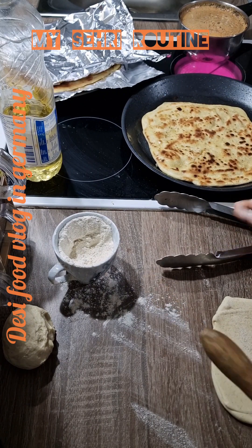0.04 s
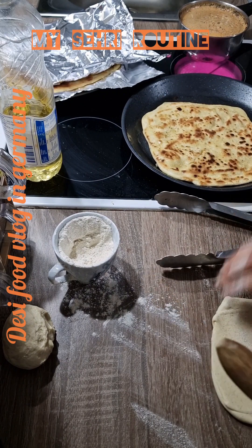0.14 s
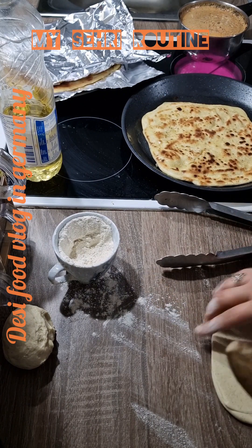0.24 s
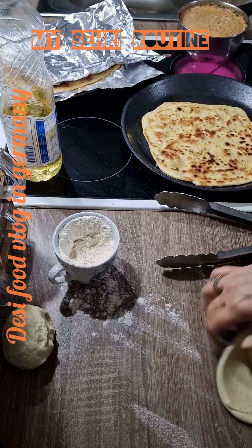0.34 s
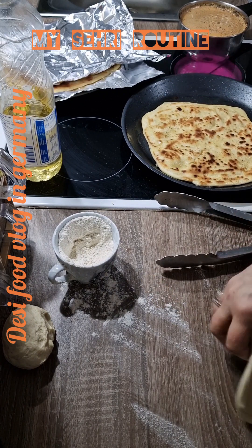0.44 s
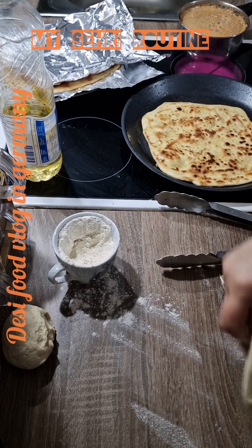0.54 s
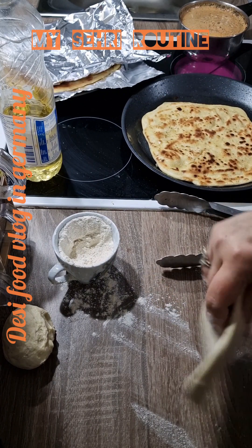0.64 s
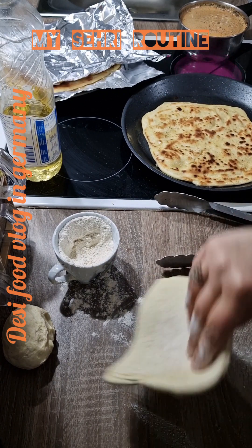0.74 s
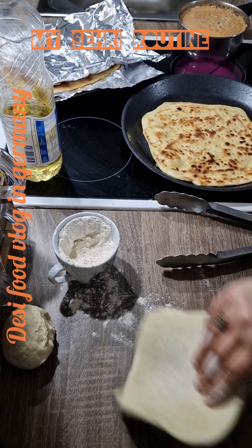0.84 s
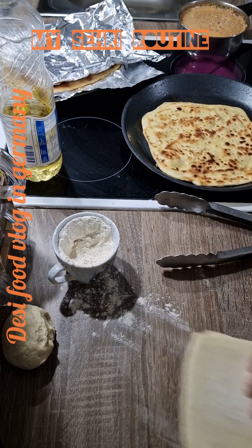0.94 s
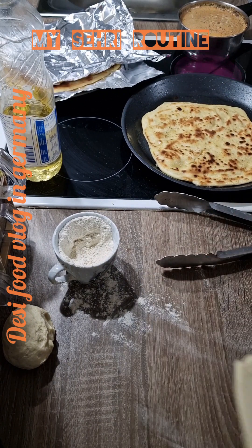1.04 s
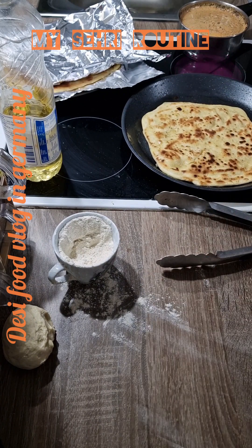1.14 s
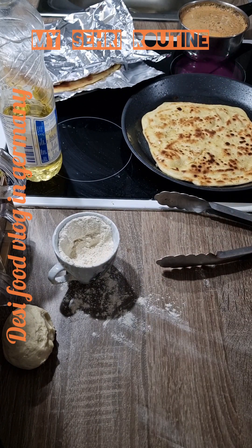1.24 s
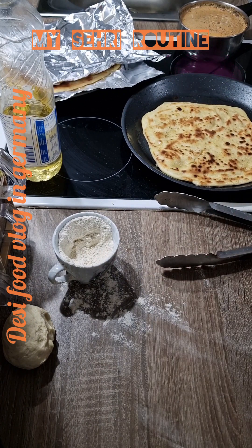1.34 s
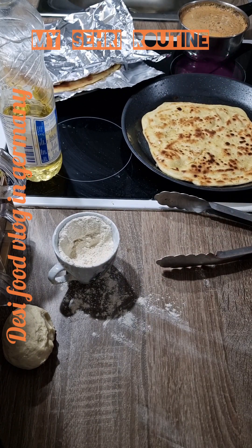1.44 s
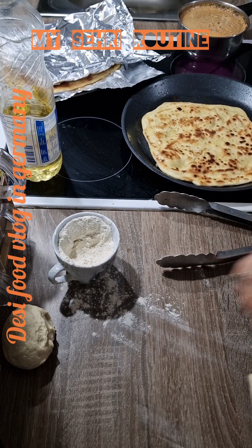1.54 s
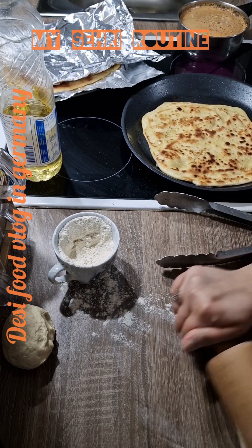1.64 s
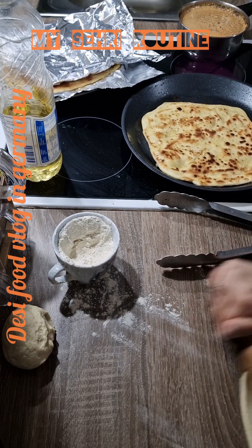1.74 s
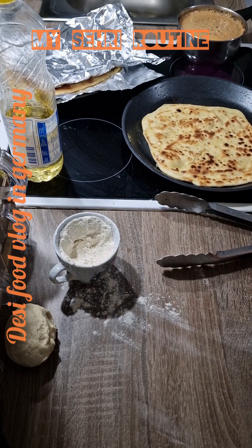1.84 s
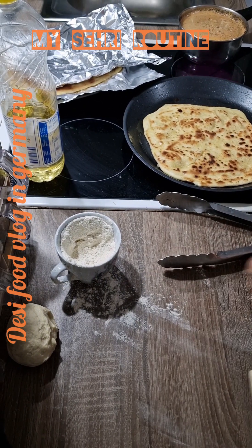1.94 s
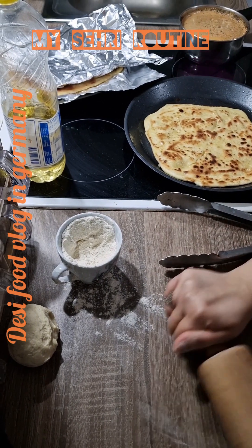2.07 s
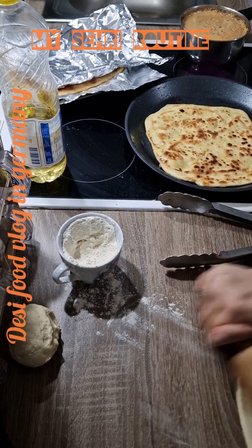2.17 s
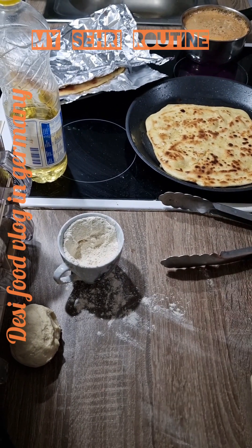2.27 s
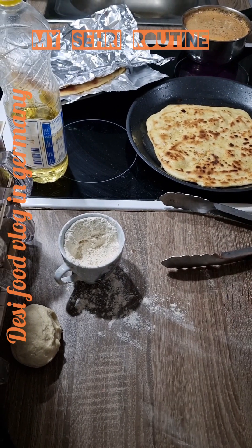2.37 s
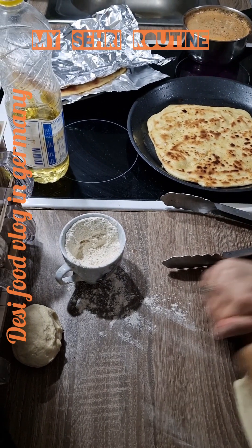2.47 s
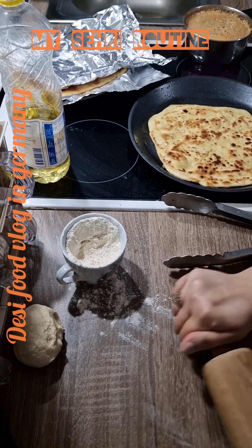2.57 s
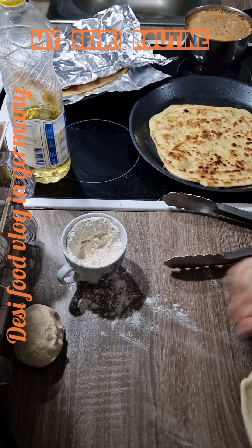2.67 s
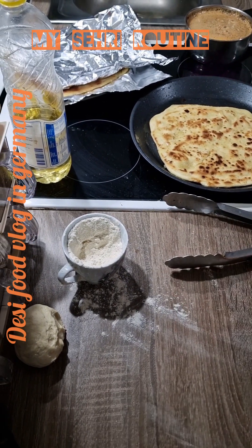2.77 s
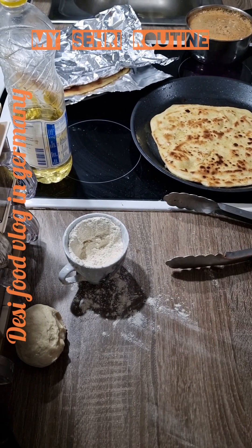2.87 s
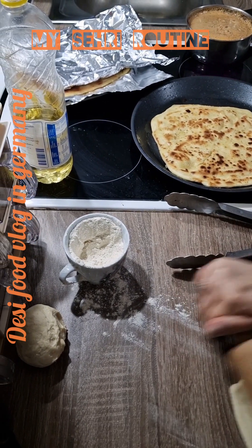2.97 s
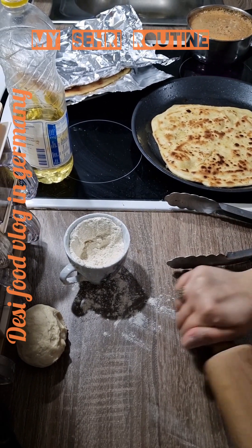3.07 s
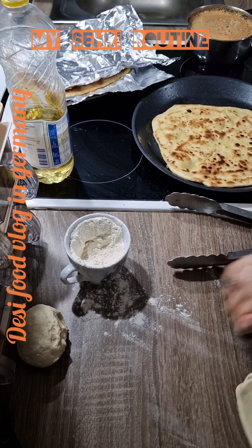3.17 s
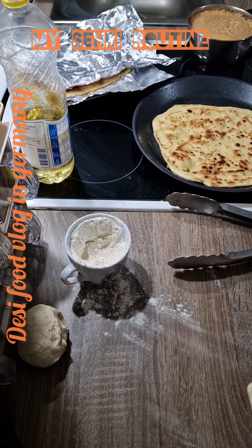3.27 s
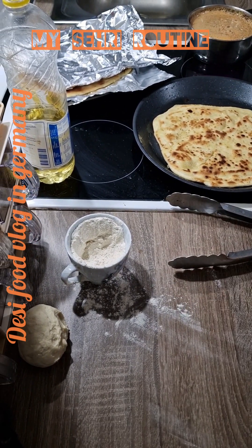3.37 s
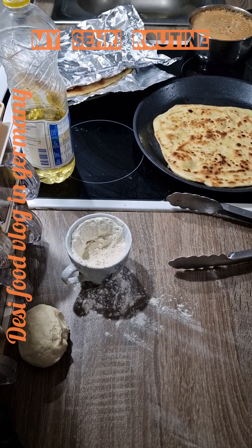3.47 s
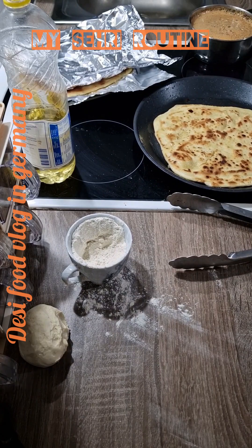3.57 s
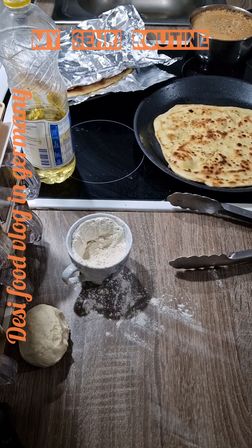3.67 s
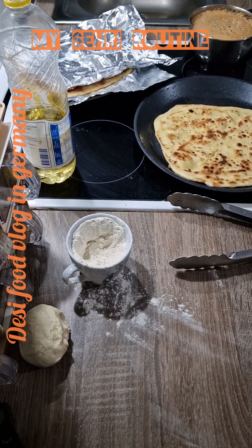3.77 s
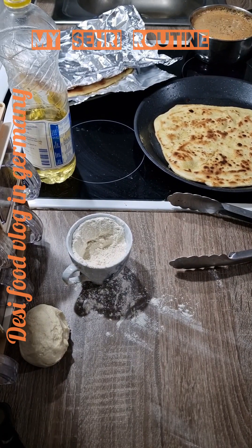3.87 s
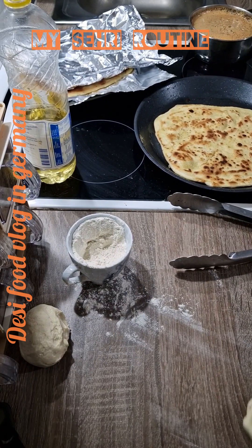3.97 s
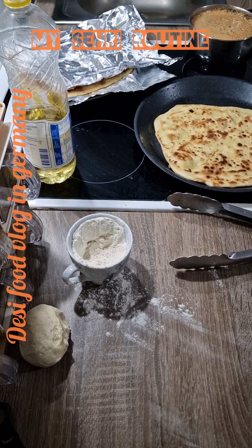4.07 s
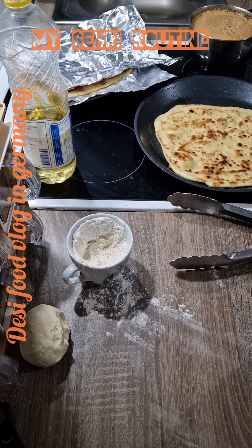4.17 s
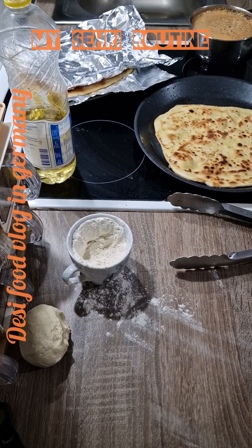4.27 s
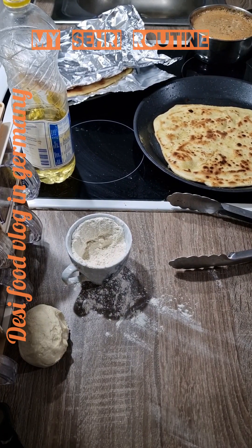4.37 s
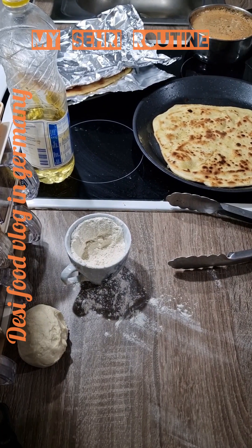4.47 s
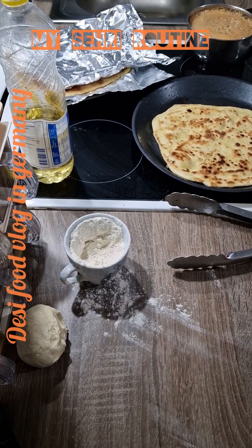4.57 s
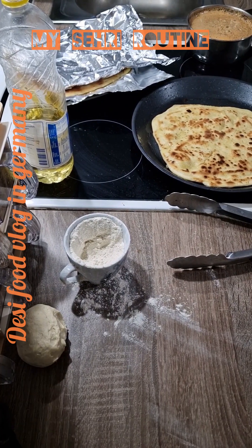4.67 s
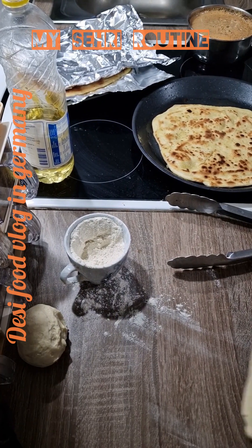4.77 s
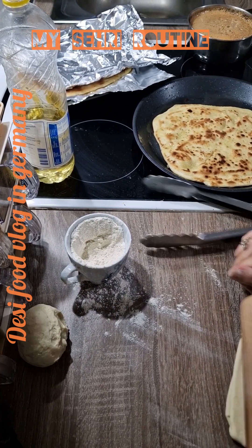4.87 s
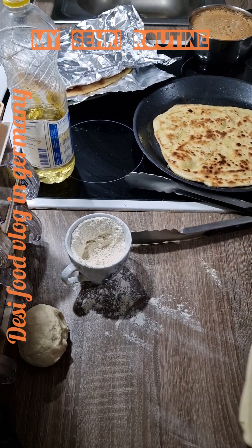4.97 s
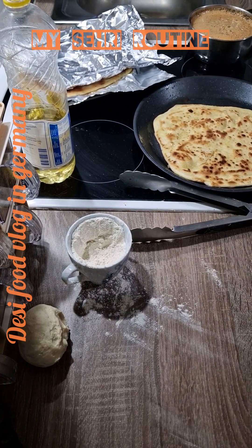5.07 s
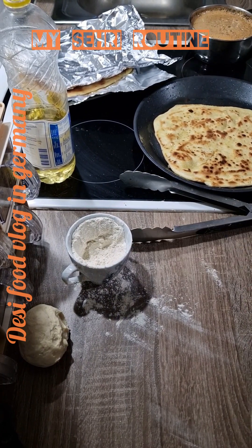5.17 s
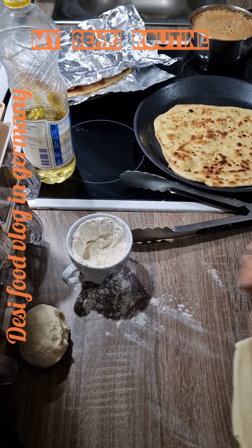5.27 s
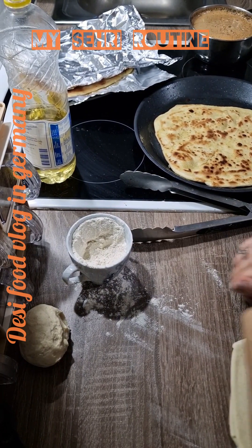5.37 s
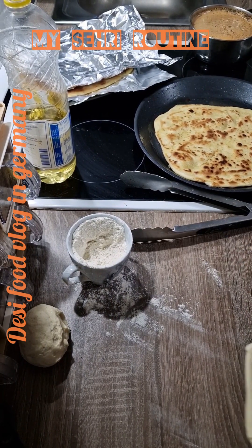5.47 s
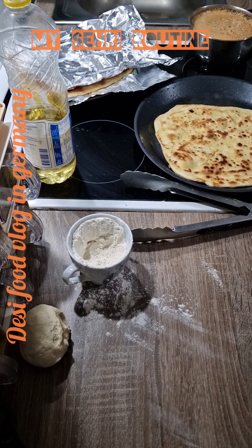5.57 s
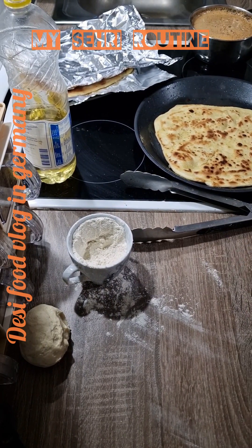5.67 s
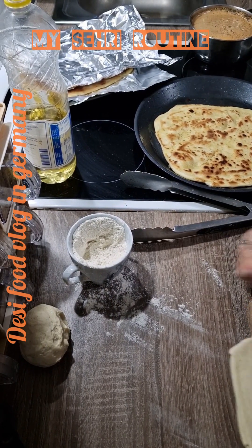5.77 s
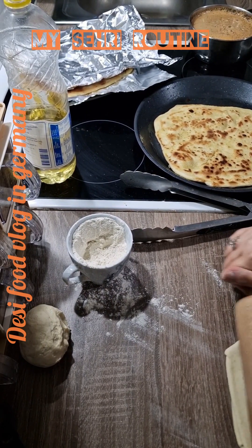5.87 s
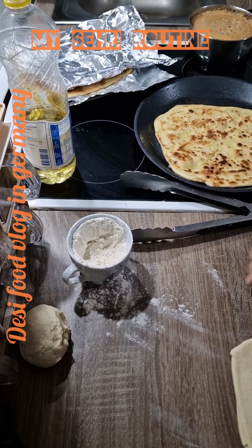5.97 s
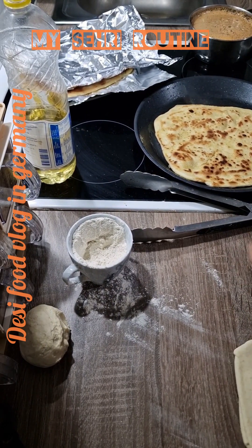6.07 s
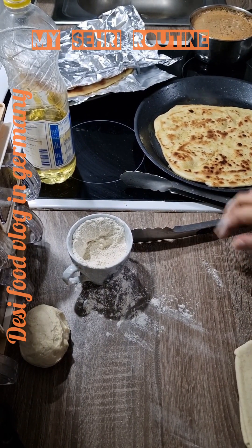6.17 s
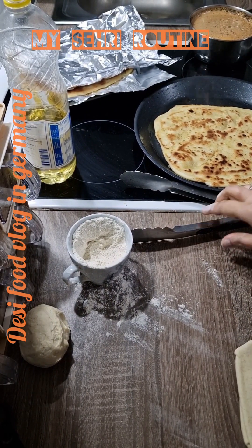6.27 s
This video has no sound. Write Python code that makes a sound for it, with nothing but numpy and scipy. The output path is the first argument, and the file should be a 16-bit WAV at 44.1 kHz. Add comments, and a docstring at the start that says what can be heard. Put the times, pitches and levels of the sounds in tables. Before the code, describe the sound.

A wooden rolling pin knocks once sharply, then rumbles softly back and forth over dough, before metal tongs clack loudly on the kitchen counter.

```python
"""A wooden pin rolls dough to and fro on a kitchen counter, close to a phone with two spaced microphones.
Noise through the counter's low resonances makes the rolling rumble; soft blows ring them as thuds.
Flour hisses as shaped noise, a rub sounds in bands, and short noisy blows make the pin knock.
Steel tongs are shoved along the top and clack down, ringing their arms; the phone's stand shudders.
A small hard room answers with decaying noise over a faint steady hiss."""
import sys
import numpy as np
from scipy import signal
from scipy.fft import rfft, irfft, next_fast_len
from scipy.io import wavfile
from scipy.ndimage import map_coordinates

SR = 44100
rng = np.random.default_rng(int(sys.argv[2]) if len(sys.argv) > 2 else 0)


def volts(x):
    """Linear amplitude factor 10**(x/20) for a level x in dB, scalar or array-like."""
    e = np.asarray(x, float) / 20
    return 10 ** e


def dump_mix(stems):
    """Bounce the given channels to the path in sys.argv[1] as a 16-bit WAV at rate SR."""
    frames = np.atleast_2d(stems).T  # one column per channel
    limited = np.clip(frames, -1, 1)  # hard clip at full scale
    pcm = np.round(limited * 32767).astype(np.int16)
    wavfile.write(sys.argv[1], SR, pcm)


N = 278712  # length [samples]


def unit(x):
    """Scaled to rms 1."""
    return x / np.sqrt(np.mean(x ** 2) + 1e-20)


def along(points, hz):
    """Reads a curve of (frequency [Hz], value) points on a log frequency axis."""
    f, v = np.transpose(points)
    return np.interp(np.log(hz + 1), np.log(f + 1), v)


def wobble(rate):
    """A smooth random curve with rate knots a second."""
    knots = rng.standard_normal(int(N * rate / SR) + 4)
    return map_coordinates(knots, [np.arange(N) * rate / SR])


def filtered(x, response):
    """Shapes the spectrum of x by a complex response of frequency."""
    n = x.shape[-1]
    m = next_fast_len(n + SR // 2)
    return irfft(rfft(x, m) * response(np.fft.rfftfreq(m, 1 / SR)), m)[..., :n]


def body(modes):
    """Response of an object with (frequency [Hz], width [Hz], level [dB]) modes of alternating sign."""
    def response(f):
        total = 0
        for k, (center, width, db) in enumerate(modes):
            loss = 1j * f * width
            total = total + (-1) ** k * volts(db) * loss / (center * center - f * f + loss)
        return total
    return response


def add(track, s, sound):
    """Mixes a sound in at s seconds."""
    part = track[round(s * SR):][:len(sound)]
    part += sound[:len(part)]


def gritty(rough_db):
    """Noise whose size varies at random from grain to grain."""
    return unit(rng.standard_normal(N) * volts(rough_db * wobble(400)))


def dying(start, rise, steady, db, t60):
    """Summed gain of events that rise, hold until steady seconds after the start, and die away."""
    t = np.arange(N) / SR - start
    fade_db = -60 * (t - steady).clip(0) / t60
    return np.sum(volts(db + fade_db) * (t / rise).clip(0, 1), axis=0)


def struck(db, modes, tilt_db, chatter_s, touch):
    """A first touch and dying contact chatter excite the modes; tilt_db sets the brightness per octave."""
    t = np.arange(SR // 5) / SR
    blow = volts(-60 * t / max(chatter_s, 1 / SR)) * rng.standard_normal(len(t))
    blow[0] = touch  # size of the first contact against the chatter after it
    ring = filtered(blow, lambda f: body(modes)(f) * (1 + 1j * f / 1000) ** (tilt_db / 6))
    return volts(db) * ring / np.abs(ring).max()


# modes of the counter top: (frequency [Hz], width [Hz], relative level [dB])
COUNTER_MODES = [(86, 8, -5), (135, 13, 0), (165, 18, -8), (205, 16, -4), (290, 16, -8), (410, 30, -14),
                 (500, 50, -19)]


def rolling(gain):
    """Uneven contact under pin and hands drives the counter, now one low mode more, now another."""
    bumps = gritty(rough_db=1.5) * volts(2.1 * wobble(45))
    modes = [filtered(bumps, body([mode])) * volts(2.5 * wobble(11)) for mode in COUNTER_MODES[:5]]
    alternating = sum(modes[::2]) - sum(modes[1::2])
    cushioned = filtered(alternating, lambda f: 1 / (1 + 1j * f / 450) ** 2)
    murmur = volts(-75 + 3.5 * wobble(6.7))  # the top's murmur under resting hands
    return (gain + murmur) * unit(cushioned)


# the pin runs out or back over the dough:
# (middle time [s], length [s], counter rumble level [dB], flour hiss level [dB])
ROLLING_STROKES = [(1.61, 0.19, -51, -52), (1.78, 0.16, -49.5, -51.5), (1.99, .2, -47.5, -54.5),
                   (2.22, 0.19, -47.5, -54.5), (2.47, 0.18, -46.5, -53.5), (2.71, .2, -47, -54),
                   (2.95, 0.17, -45.5, -53), (3.22, .24, -54, -59), (5.25, 0.23, -53, -58),
                   (5.47, 0.22, -51, -56.5), (5.73, 0.18, -48, -55.5)]
# hands and dough slide over the top:
# (middle time [s], length [s], counter rumble level [dB], flour hiss level [dB])
HAND_SLIDES = [(.245, 0.044, -74, -58.5), (.325, 0.029, -50, -46.5), (.57, 0.59, -82, -61),
               (.98, 0.26, -66, -52), (1.11, 0.096, -54, -57), (1.43, .08, -67, -60), (3.44, .1, -56, -70),
               (3.68, .08, -67, -56), (3.93, 0.19, -63.5, -56), (4.12, 0.087, -64.5, -66),
               (4.27, 0.13, -84, -59), (4.54, 0.018, -63.5, -91.5), (4.72, 0.48, -53.5, -55.5),
               (5.07, 0.17, -66, -65), (6.0, 0.089, -64, -79)]


def movements():
    """Gains of rumble and hiss, which swell to each movement's middle and fade again."""
    def swell(t, length, db, shape):
        edge_db = 19.5  # how far a movement's ends lie under its middle
        return np.sum(volts(db - edge_db * np.abs(2 * t / length).clip(0, 4) ** shape), axis=0)

    rumble, hiss = 0, 0
    # a higher shape has a flatter top
    for rows, rumble_shape in [(ROLLING_STROKES, 1.9), (HAND_SLIDES, 1.7)]:
        middle, length, rumble_db, hiss_db = np.transpose(rows)[:, :, None]
        t = np.arange(N) / SR - middle
        rumble = rumble + swell(t, length, rumble_db, rumble_shape)
        # hiss follows speed: flat-topped, 16 ms earlier, a little longer
        hiss = hiss + swell(t + 0.016, length * 1.04, hiss_db, 3.76)
    return rumble, hiss


# blows on the counter; where one lands sets how much it drives the lowest and the upper modes:
# (time [s], peak level before radiation [dB], contact [ms], lowest mode [dB], upper modes [dB])
COUNTER_BLOWS = [(0.221, -29.5, 4.6, 1, -4), (.236, -29, 0.43, -1, 11.5), (.254, -31.5, 1.6, 8, -28),
                 (0.314, -40.5, 1.2, 6, 6), (0.831, -46, 2.5, -17, 13), (.861, -34.5, 4.7, 1, 18.5),
                 (1.088, -39, 1.2, -18, -0.5), (1.455, -42, 3, 7, -17), (1.469, -27, 0.73, 8, 5),
                 (1.506, -37, 1.9, 9, -4), (3.389, -36.5, 1.9, -14, -4.5), (3.564, -29.5, 4.5, -20, 14),
                 (3.603, -39, 2.5, 2, 7), (3.65, -39, 3.3, -16, 11.5), (4.295, -33.5, 3.4, -18, -2.5),
                 (4.331, -45.5, 1.3, -7, -1), (4.634, -31, 5.7, 11, -19), (4.663, -32, 5.4, 23, -9),
                 (4.788, -16, 1, -9, 11.5), (4.855, -24, 3, -11, 5), (4.874, -22.5, 6.4, -13, -16),
                 (5.394, -45, 7.4, -23, 2)]


def thuds():
    """A soft push rings the counter; long contact drives the high modes less."""
    out, t = np.zeros(N), np.arange(SR // 2) / SR
    hz, width, level = np.transpose(COUNTER_MODES)[:, :, None]
    sign = (-1) ** np.arange(len(hz))[:, None]
    for s, db, contact_ms, low_db, upper_db in COUNTER_BLOWS:
        spot = volts(np.where(hz < 110, low_db, np.where(hz > 250, upper_db, 0)))
        drive = sign * volts(level) * spot / (1 + (hz * contact_ms / 1000) ** 2)
        ring = np.sum(drive * np.exp(-np.pi * width * t) * np.sin(2 * np.pi * hz * t), axis=0)
        ring *= 1 - np.exp(-t * 1000 / contact_ms)  # soft onset
        add(out, s, volts(db) * ring / np.abs(ring).max())
    # the top radiates little below its first mode
    return filtered(out, lambda f: (1j * f / (40 + 1j * f)) ** 4)


# colour of the flour's hiss: (frequency [Hz], relative level per Hz [dB])
FLOUR_COLOUR = [(880, -7.5), (1500, 2), (2060, 2.5), (2660, -1.5), (3270, -1), (5190, -3), (5900, -1.5),
                (7620, 1.5), (9750, -5.5), (15200, -3.5), (15800, 6)]


def flour(gain):
    """Flour grains hiss as rough, coloured noise that follows the movements."""
    return gain * unit(filtered(gritty(rough_db=5.5), lambda f: volts(along(FLOUR_COLOUR, f))))


# resonances of the banded rub: (frequency [Hz], width [Hz], relative level [dB])
RUB_MODES = [(673, 160, 0.5), (1365, 93, 1), (2050, 116, 4), (3515, 140, -0.5), (4200, 93, 1.5),
             (4570, 220, 1), (5420, 220, -1), (6700, 27, -2)]
# course of the banded rub: (time [s], level [dB])
RUB_COURSE = [(0, -61), (0.302, -67.5), (.44, -56), (.8, -61), (1.2, -66), (1.4, -58.5), (1.64, -53.5),
              (1.8, -64.5), (2.0, -70), (2.15, -70.5), (2.9, -72), (3.35, -61), (3.55, -63.5),
              (3.95, -69.5), (4.3, -69), (4.6, -81), (5.15, -63.5), (5.45, -84), (6.32, -85)]


def banded_rub():
    """A rub with a resonant colour: rough noise through a few bands, its level wavering."""
    level_db = np.interp(np.arange(N) / SR, *np.transpose(RUB_COURSE))
    return volts(level_db + 1.3 * wobble(30)) * unit(filtered(gritty(rough_db=2.0), body(RUB_MODES)))


# the pin's own ring: (frequency [Hz], width before damping [Hz], relative level [dB])
PIN_MODES = [(560, 660, -23), (1123, 200, -9.5), (1233, 110, -4.5), (1574, 230, -4), (1840, 205, -3.5),
             (2470, 170, -10.5), (2910, 63, -4.5), (3244, 57, 1.5), (3377, 37, 2.5), (3573, 120, -7),
             (4280, 100, -13), (4660, 110, -9.5), (6400, 320, -28), (7560, 350, -19.5)]
# bare wood of the pin meets the top: (time [s], peak level before radiation [dB],
# brightness [dB per octave], contact chatter t60 [s], damping by the hand [factor])
PIN_KNOCKS = [(.227, -44.5, -20, 0.25, 1.7), (.316, -34, -8, 0.089, 1.8), (0.862, -52, -13, 0.018, 2.2),
              (1.09, -40, -18, 0.015, 1.1), (1.471, -10, 0, 0.0014, 1.13), (3.388, -22.5, -8.5, 0.006, 2.6),
              (3.564, -38, -17.5, 0.0069, 4.7), (3.651, -38.5, -23, 0.014, 3.6),
              (4.296, -36, -21, 0.012, 2.5), (4.62, -51, -21, 0.049, 2.7)]


def knocks():
    """The pin rings briefly; the gripping hand widens its modes."""
    out = np.zeros(N)
    for s, db, tilt_db, chatter_s, damping in PIN_KNOCKS:
        held = [(hz, width * damping, level) for hz, width, level in PIN_MODES]
        add(out, s, struck(db, held, tilt_db, chatter_s, touch=12))
    # the slim pin radiates little below 695 Hz, soft wood excites little above 5960 Hz
    return filtered(out, lambda f: 1j * f / (695 + 1j * f) / (1 + 1j * f / 5960))


# the tongs' steel arms: (frequency [Hz], width [Hz], relative level [dB])
TONGS_MODES = [(720, 200, -8), (1020, 120, -5), (1290, 120, -1), (1450, 90, 0), (1850, 300, -12),
               (2230, 200, -6), (2730, 300, -9), (3250, 350, -10), (3740, 300, -7), (4400, 400, -11),
               (5200, 700, -16), (6400, 900, -22), (7900, 700, -16), (9900, 800, -23), (12000, 1500, -27),
               (15300, 1200, -25)]
# higher modes of the top under hard steel: (frequency [Hz], width [Hz], relative level [dB])
CHATTER_MODES = [(289, 106, -2), (333, 26, 6), (344, 50, -2.5), (427, 18, 3.5), (478, 88, -6),
                 (619, 18, -2.5), (683, 20, 2), (739, 30, 1), (900, 180, -4), (1077, 41, 0),
                 (1113, 120, -3)]
# the tongs drag: (start time [s], steady [s], steel level before the group offsets [dB],
# counter chatter level [dB], dying t60 before the group factors [s])
TONGS_DRAGS = [(3.991, 0.087, -36, -66, 0.053), (4.079, 0.034, -44, -59, 0.16),
               (4.787, .066, -41.5, -26, 0.042), (4.857, 0.022, -30, -26.5, 0.36),
               (4.969, 0.03, -78, -39, 0.14)]
# offsets of the steel's low, middle, high and highest modes in a drag: (level [dB])
GROUP_DB = [-1, -1, -4.5, -8]
# dying time of the same four groups against the drag's: (t60 [factor])
GROUP_DYING = [0.96, 0.66, 0.8, .8]
# a hard shove grinds more grit; what each group gains: (level per dB of chatter over steel [dB])
GROUP_GRIND = [-0.035, 0.055, -0.096, 0.22]


def drags():
    """Sliding steel grips unevenly: the top chatters and the arms ring, each group dying at its own speed."""
    start, steady, steel_db, chatter_db, t60 = np.transpose(TONGS_DRAGS)[:, :, None]
    groups = [CHATTER_MODES, TONGS_MODES[:4], TONGS_MODES[4:7], TONGS_MODES[7:11], TONGS_MODES[11:]]
    rise = .003  # seconds
    gains = [dying(start, rise, steady, chatter_db, t60)]
    for offset_db, share, grind in zip(GROUP_DB, GROUP_DYING, GROUP_GRIND):
        group_db = steel_db + offset_db + grind * (chatter_db - steel_db)
        gains.append(dying(start, rise, steady, group_db, t60 * share))
    slips = volts(4 * wobble(300) + 1.5 * wobble(70))  # fine grains and a slower judder
    parts = []
    for gain, modes in zip(gains, groups):
        parts.append(gain * unit(filtered(slips * rng.standard_normal(N), body(modes))))
    top, *arms = parts
    # the thin arms radiate little below 656 Hz
    return top + filtered(sum(arms), lambda f: (1j * f / (656 + 1j * f)) ** 2)


# the tongs' tips strike:
# (time [s], peak level [dB], brightness [dB per octave], contact chatter t60 [s])
TONGS_CLACKS = [(3.607, -31.5, 12.5, 0.03), (3.992, -21.5, -0.5, 0.012), (4.036, -31, -2, 0.0083),
                (4.789, -20, 0, 0.0066), (4.796, -25, 5, 0.018), (4.802, -20.5, -5, 0.0093),
                (4.857, -13.5, -3.5, 0.013), (4.8576, -9, 5.5, 0.029), (4.874, -10, 0.5, 0.035)]


def clacks():
    """The tips strike and the steel arms ring."""
    out = np.zeros(N)
    for s, db, tilt_db, chatter_s in TONGS_CLACKS:
        add(out, s, struck(db, TONGS_MODES, tilt_db, chatter_s, touch=4))
    return out


# jolts that shake the stand: (time of full strength [s], level [dB], dying t60 [s])
STAND_JOLTS = [(.24, -74, 0.95), (.9, -76, .8), (1.49, -58, 0.66), (1.91, -55, .8), (2.1, -73, .8),
               (2.36, -65, .9), (2.86, -68, 1.2), (3.41, -77, .5), (4.33, -78, .5), (4.63, -58.5, 1),
               (4.85, -64, .9), (5.35, -79, .8), (5.67, -71, .9)]


def shudder():
    """The stand trembles faintly and shakes after each jolt, a deep shudder unlike at the two ports."""
    peak, db, t60 = np.transpose(STAND_JOLTS)[:, :, None]
    deep = rng.standard_normal(N) + .6 * rng.standard_normal((2, N))  # shared part plus each port's own
    rise, still_db = .04, -81.5  # seconds; level of the faint tremble
    gain = volts(still_db) + dying(peak - rise, rise, rise, db, t60)
    return gain * unit(filtered(deep, lambda f: body([(42, 30, 0)])(f) ** 2))


# left-right likeness of diffuse sound: (frequency [Hz], likeness [-1 to 1])
LIKENESS = [(60, 0.46), (150, 0.92), (380, 0.86), (950, -0.048), (2380, -0.1), (5980, -0.066),
            (15000, -0.035)]


def diffuse(pair):
    """Makes two unrelated signals as alike as the two ports hear sound from all around."""
    def blend(hz):
        turn = np.arccos(np.clip(along(LIKENESS, hz), -1, 1)) / 2
        return np.array([np.cos(turn), np.sin(turn)])
    mid, side = filtered(pair, blend)
    return np.array([mid + side, mid - side])


# dying time of the room: (frequency [Hz], t60 [s])
ROOM_DYING = [(150, 0.37), (1000, 0.2), (4000, 0.2), (12000, 0.13)]


def kitchen(x):
    """The room's tail is noise in which each frequency dies at its own speed."""
    hz, t, z = signal.stft(rng.standard_normal((2, SR // 2)), SR, nperseg=256)
    fade = volts(-60 * t / along(ROOM_DYING, hz)[:, None])
    tail = signal.istft(z * fade, SR, nperseg=256)[1]
    tail = tail / np.linalg.norm(tail[0])
    late = np.pad(x, (150, 0))[None]  # the room answers 150 samples later
    return diffuse(signal.fftconvolve(late, tail, axes=1)[:, :N])


def heard(x, lag_ms, pan_db, room_db):
    """Direct sound reaches the left port lag_ms later and pan_db louder than the right; the room follows."""
    sides = np.array([[.5], [-.5]])

    def paths(hz):
        return volts(pan_db * sides) * np.exp(-2j * np.pi * hz * lag_ms / 1000 * sides)
    return filtered(x, paths) + volts(room_db) * kitchen(x)


# colour of the steady hiss: (frequency [Hz], relative level per Hz [dB])
AIR_COLOUR = [(12, -31), (20, -14.5), (158, -6), (570, -15.5), (866, -11.5), (1210, -8), (1390, -10.5),
              (1560, -14.5), (2240, -11.5), (2960, -14), (3400, -14.5), (7440, -11.5), (9830, -17.5),
              (14100, -14), (15800, -14)]


def air():
    """A faint steady hiss: coloured noise from all around, 1.6 dB stronger on the left."""
    noise = filtered(rng.standard_normal((2, N)), lambda f: volts(along(AIR_COLOUR, f)))
    return volts(-57) * unit(diffuse(noise)) * volts([[.8], [-.8]])


def scene():
    """Rolling, blows and tongs on the counter, over the steady hiss."""
    rumble, hiss = movements()
    low = heard(rolling(rumble) + thuds(), lag_ms=.1, pan_db=-.6, room_db=-14)
    rubbing = heard(flour(hiss), lag_ms=0.221, pan_db=-11.0, room_db=3.5)
    rubbing += heard(banded_rub(), lag_ms=0.097, pan_db=-1.0, room_db=-3.5)
    pin = heard(knocks(), lag_ms=0.15, pan_db=-8.0, room_db=-3.5)
    steel = heard(drags(), lag_ms=-.12, pan_db=-4.0, room_db=-4.0)
    steel += heard(clacks(), lag_ms=-0.15, pan_db=2.7, room_db=-5.5)
    return low + rubbing + pin + steel + shudder() + air()


# difference in colour of the two ports: (frequency [Hz], left minus right level [dB])
PORT_COLOUR = [(60, 0), (120, -1), (240, 2.5), (480, 6), (950, -2.5), (1890, 1.5), (3770, 1.5), (7520, 2),
               (15000, 7)]


def microphones(dry):
    """The two ports differ in colour and fall off steeply above 16 kHz."""
    def response(hz):
        colour = volts(along(PORT_COLOUR, hz) * np.array([[.5], [-.5]]))
        return colour / (1 + (hz / 16000) ** 120)
    return filtered(dry, response)


def band_limit(x):
    """A steep low-pass at the top of the band."""
    return signal.sosfilt(signal.butter(12, 17160, fs=SR, output="sos"), x)


def record(dry):
    """The scene as picked up by the two microphones."""
    mix = microphones(dry)
    return band_limit(mix)


dry = scene()
out = record(dry)
dump_mix(out)
```